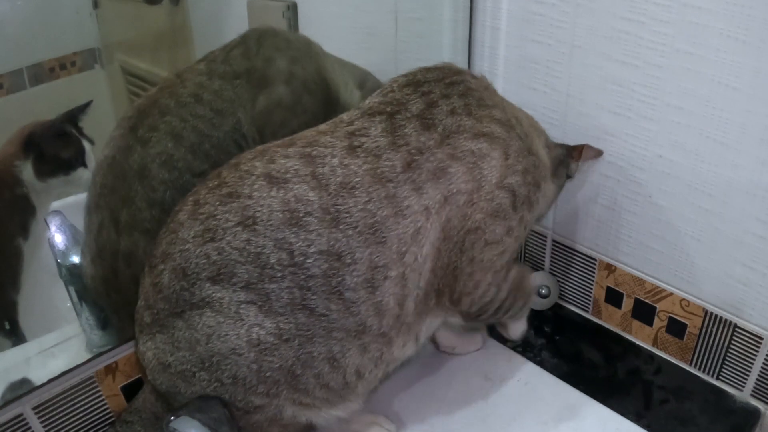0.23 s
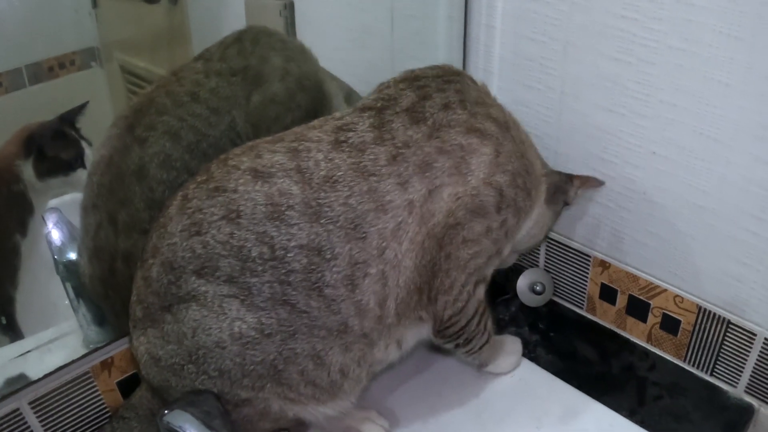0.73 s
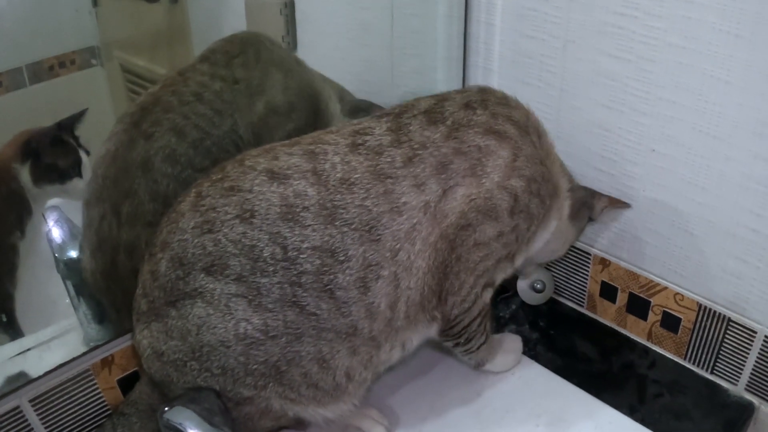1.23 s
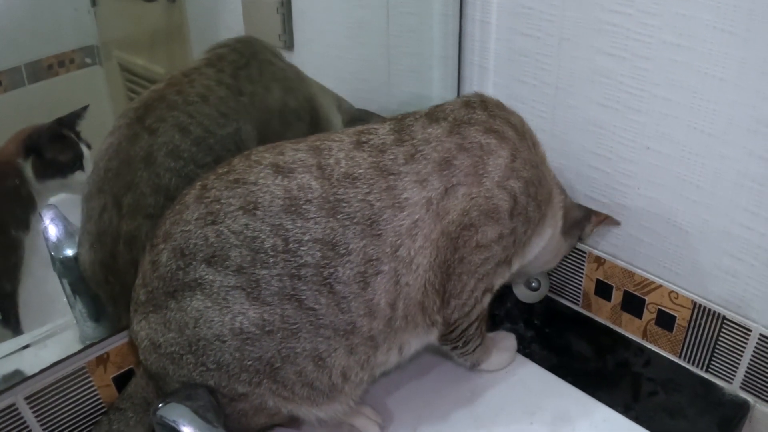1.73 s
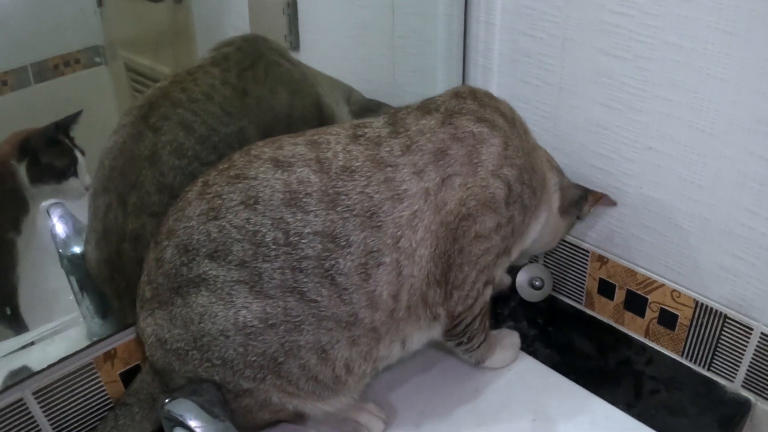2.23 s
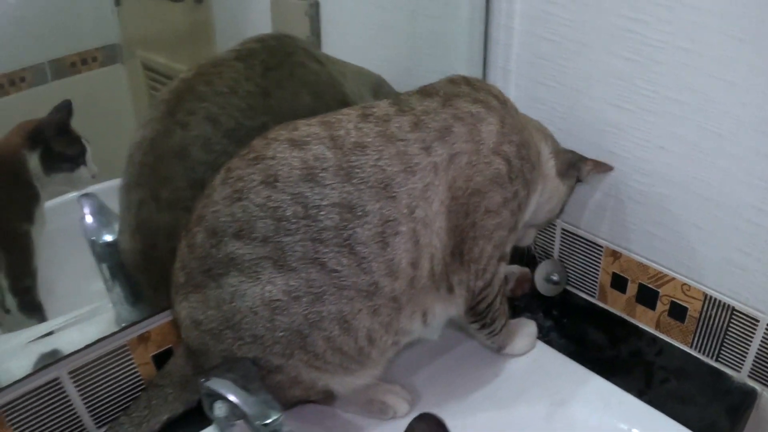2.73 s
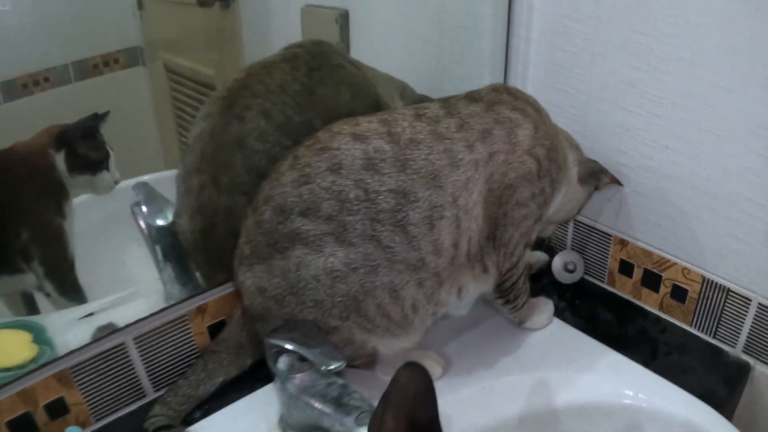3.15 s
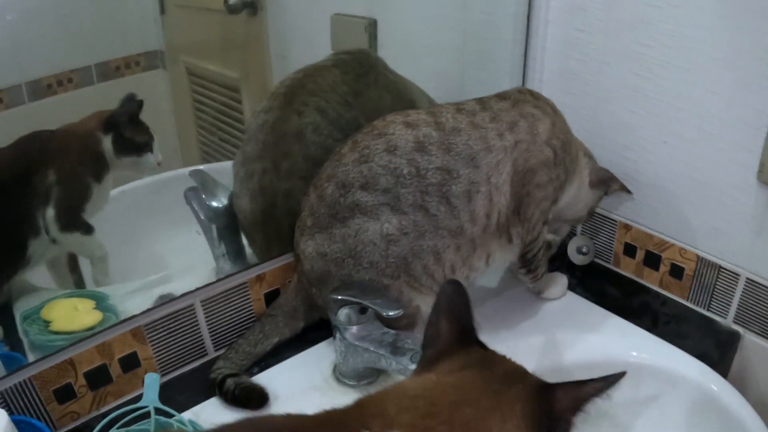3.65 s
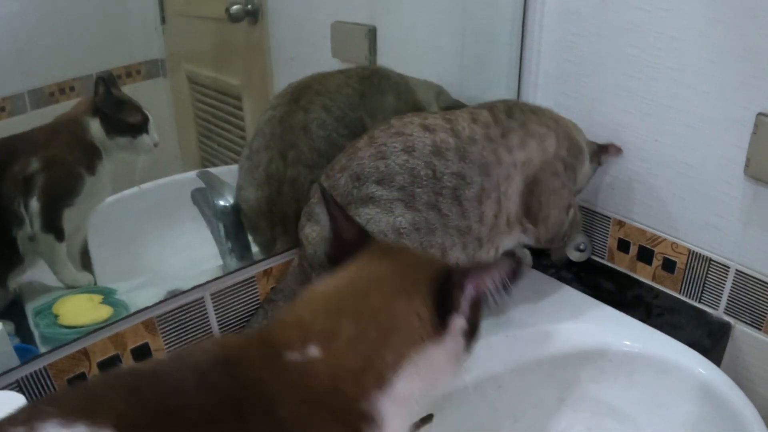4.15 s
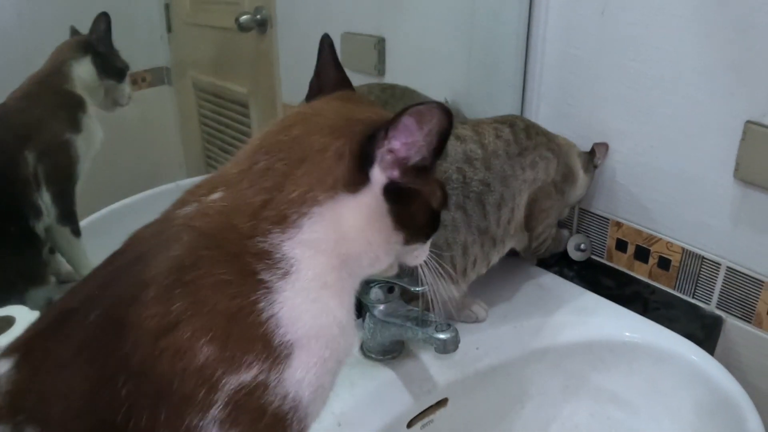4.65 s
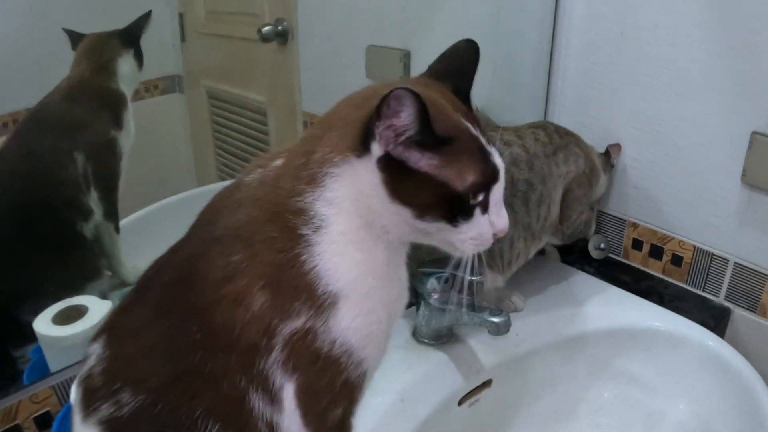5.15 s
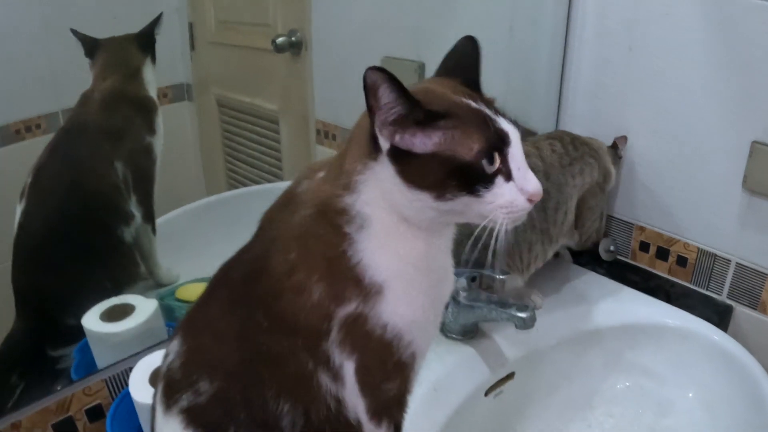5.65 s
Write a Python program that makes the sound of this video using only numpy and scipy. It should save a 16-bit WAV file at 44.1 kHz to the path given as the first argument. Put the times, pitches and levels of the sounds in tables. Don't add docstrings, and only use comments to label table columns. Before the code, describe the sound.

Over low extractor hum in a small hard-walled bathroom, thin mouse peeps grow into raspy squeal clusters amid small paw knocks and scrapes.

```python
import sys
import numpy as np
from scipy import signal
from scipy.fft import rfft, irfft, next_fast_len
from scipy.io import wavfile
from scipy.ndimage import map_coordinates

SR = 44100
rng = np.random.default_rng(int(sys.argv[2]) if len(sys.argv) > 2 else 0)


def inscribe(sig):
    pcm = np.round(np.clip(np.atleast_2d(sig).T, -1, 1) * 32767)
    wavfile.write(sys.argv[1], SR, pcm.astype(np.int16))


def volts_from_db(level):
    exponent = np.asarray(level, float) / 20
    return 10 ** exponent


N = 259969
TIME = np.arange(N) / SR

# t/s, mains hum level/dB, blade rumble level/dB
FAN_LEVELS = [(.4, -49, -61.5), (.98, -48, -60.5), (1.5, -49, -61.5), (1.93, -48.5, -64.5),
              (2.4, -49, -62.5), (3, -50, -62), (3.5, -50.5, -65.5), (4.4, -51, -65.5), (5.1, -52.5, -69),
              (5.47, -52, -63.5), (5.89, -52.5, -65)]
# f/Hz, density/dB
RUMBLE_SPECTRUM = [(11, -73), (18, -16), (43, -40), (68, -3.5), (97, -18), (123, 1.5), (155, -5.5),
                   (212, -8.5), (257, -28), (305, -22.5), (400, -18), (520, -52), (880, -120)]
# f/Hz, density/dB
AIR_SPECTRUM = [(150, -47), (250, -11.5), (301, -8.5), (335, -12.5), (443, -12.5), (748, -18.5),
                (859, -19.5), (943, -22), (1280, -17.5), (1690, -18.5), (3450, -24.5), (7230, -34),
                (10000, -59), (13000, -111), (22000, -120)]
# t/s, knock level/dB, then thud, scratch, edge re knock/dB
PAW_CONTACTS = [(1.1244, -53.5, -26, -25, -63), (2.5223, -38, -5, -2, -40), (2.65, -45, -22, 2, -15),
                (2.826, -25, -70, 2.5, -8), (2.8689, -32, -50, -1, -14), (3.026, -41, -12.5, -19, -31),
                (3.1662, -43, -22, -18, -27), (3.2778, -36, -38, -12, -17), (3.2874, -33, -45, -10, -6),
                (3.3147, -40, -45, 4, -28), (3.422, -47, -36, 1, -27), (3.4858, -30, -56, 8, -1),
                (3.4982, -37, -39, 14.5, -15), (3.5297, -36, -28, -3, -27), (3.6024, -42, -0.5, 5, -33),
                (4.3044, -30, -33, 2, 4), (4.4661, -31, -43, -15, -13), (4.671, -42, -36, -15, -30),
                (4.888, -34, -38, -15, -30), (4.6185, -36, -45, 12, -18), (5.287, -36.5, -33, 5, -22),
                (5.3223, -47.5, -14, 2, -15), (5.435, -42, -46, 13.5, -26)]
# f/Hz, width/Hz, level/dB
TILE_MODES = [(1550, 450, 0), (2000, 600, -2), (2550, 500, -1)]
# f/Hz, width/Hz, level/dB
CLAW_MODES = [(3500, 900, 0), (4850, 900, 1)]
# f/Hz, width/Hz, level/dB
BASIN_MODES = [(255, 45, 5), (320, 50, 3), (600, 120, 0), (820, 200, -4)]
# peak t/s, swell/s, fade/s, peak level/dB
FUR_STROKES = [
    (1.5, 0.13, 0.02, -70),
    (1.575, 0.047, 0.026, -62.5),
    (1.867, 0.054, 0.003, -56.5),
    (2.524, 0.039, 0.013, -48.5),
    (3.022, .005, 0.092, -53.5),
    (3.604, 0.0049, 0.15, -55.5),
    (4.048, 0.0091, 0.054, -64.5),
    (4.2, 0.12, 0.061, -65),
    (5.684, 0.0045, 0.033, -60.5),
    (5.78, 0.05, 0.039, -69),
]
# f/Hz, density/dB
FUR_SPECTRUM = [(530, -1), (900, -4), (1880, -7), (2010, -2.5), (2280, 0), (7190, -10), (9260, -24),
                (11300, -20.5), (14000, -54)]
# t/s, length/s, f/Hz, level/dB, overtone level/dB
WHISTLE_NOTES = [
    (1.641, 0.036, 3536, -47, -11.5),
    (2.117, 0.021, 3746, -37.5, -11.5),
    (2.887, 0.046, 3773, -41, -11),
    (3.224, 0.064, 3777, -44, -19.5),
    (4.247, 0.069, 3827, -33.5, -17.5),
    (5.471, 0.053, 3808, -39, -0.5),
    (5.838, 0.035, 3866, -43.5, -5.5),
]
# t/s, length/s, f/Hz, level/dB, overtone level/dB
FLIP_NOTES = [
    (1.932, 0.014, 3825, -34.5, -9),
    (2.249, 0.019, 3578, -33, -8.5),
    (2.597, 0.035, 3672, -34, -9),
    (4.42, 0.022, 3856, -34, -19),
    (4.474, 0.0088, 3935, -31.5, -9),
    (4.68, 0.051, 3886, -37, -6.5),
    (4.785, 0.073, 3766, -37, -8),
    (5.072, .032, 3837, -36.5, -8),
    (5.155, 0.022, 3724, -35.5, -23),
]
WHISTLE_PARTIALS_DB = [0, -25.5, -40]
# t/s, length/s, start f/Hz, end f/Hz, level/dB
SLIDE_NOTES = [
    (1.87, 0.018, 3930, 3410, -43),
    (1.92, 0.014, 2336, 3080, -36.5),
    (2.198, 0.019, 3650, 3210, -39),
    (2.211, 0.013, 2754, 2440, -40.5),
    (2.579, 0.023, 2970, 3660, -36),
    (4.909, 0.013, 3930, 3630, -39.5),
    (4.912, 0.0069, 2500, 1750, -38.5),
    (4.922, 0.0155, 2120, 2576, -40),
]
# t/s, f/Hz, level/dB, overtone level/dB
CRY_FALL = [
    (4.347, 2377, -33.5, 10.5),
    (4.356, 2293, -35, 1.5),
    (4.375, 2366, -38.5, 4.5),
    (4.42, 2220, -42.5, -12),
]
# t/s, f/Hz, level/dB, overtone level/dB
CRY_RISE = [
    (4.303, 1990, -50, 8),
    (4.318, 2140, -41, 11),
    (4.33, 2360, -43, 11),
    (4.342, 2470, -39.5, 7),
    (4.35, 2430, -40, 7),
]
# f/Hz, gain/dB
MOUTH_GAIN = [(4500, 3), (6000, -12), (6900, 0.5), (7700, 2.5), (8400, -7), (9500, -12), (12000, -41)]
# t/s, length/s, level/dB, brightness/dB, slap rate f/Hz
RASP_BURSTS = [(1.873, 0.0064, -38.5, -23, 1179), (1.926, .025, -49, -8, 1395),
               (2.201, 0.054, -43.5, -14, 1143), (2.538, 0.058, -39.5, -11, 1196),
               (3.778, 0.054, -64.5, 8.5, 1264), (4.282, 0.026, -47, -4.5, 1029),
               (4.33, .06, -53.5, 13, 1153), (4.39, 0.043, -44, -0.5, 1149), (4.479, .08, -50, 6, 1201),
               (4.712, .045, -46.5, 2.5, 1137), (4.756, .042, -49.5, 2.5, 756.7),
               (4.913, 0.051, -48.5, 2, 898.4), (5.099, 0.089, -50, 5.5, 1147),
               (5.315, 0.029, -49.5, 2, 1215)]
# f/Hz, density/dB
THROAT_SPECTRUM = [(600, -32), (1000, -21.5), (1450, -3), (2350, -3), (2900, -2), (3600, -1.5),
                   (4600, -6.5), (5500, -11.5), (6700, -14.5), (7500, -5.5), (8300, -16.5), (10500, -22.5),
                   (13000, -36.5), (15500, -37)]
# t/s, f/Hz, level/dB, overtone level/dB
WHINE_CONTOUR = [
    (3.745, 3580, -45, -9),
    (3.765, 3807, -42, -5),
    (3.8, 3768, -46.5, 1.5),
    (3.861, 3550, -48, 1.5),
    (3.9, 3410, -51.5, -17),
]
WHINE_PARTIALS_DB = [0, -13, -42]
# t/s, length/s, f/Hz, level/dB, overtone level/dB
SQUEAL_NOTES = [
    (4.49, 0.0671, 2362, -39, 6.5),
    (4.733, 0.024, 2246, -39, -12),
    (5.105, 0.054, 2272, -37, 2),
    (5.315, 0.031, 2420, -43.5, 0),
]
# f/Hz, t60/s
WALL_DECAY = [(200, 0.99), (700, 0.64), (1500, 0.55), (2600, 0.56), (4000, 0.44), (7000, 0.45),
              (11000, 0.45), (15000, 0.037)]
# f/Hz, gain/dB
MICROPHONE_GAIN = [(8300, 1), (8850, -3.5), (9080, -20), (9300, -6.5), (10200, 2)]
# f/Hz, gain/dB
PORT_DIFFERENCE = [(20, -18), (60, -38), (300, -28), (800, -40), (2000, -44), (9800, -40), (11300, -1),
                   (14000, -1), (16000, -5)]
# f/Hz, density/dB
PORT_HISS = [(8000, -30), (9500, -12), (10500, -3), (11500, -3), (12800, -7), (13600, -14), (14200, -30),
             (15700, -34)]


def unit(x):
    return x / np.sqrt(np.mean(x ** 2) + 1e-20)


def along(points, hz):
    f, v = np.transpose(points)
    return np.interp(np.log(hz + 1), np.log(f + 1), v)


def stretch(rows, fade_s):
    s, *cols = np.transpose(rows)
    first = round(s[0] * SR)
    t = np.arange(first, min(N, round(s[-1] * SR))) / SR
    gate = np.clip(np.minimum(t - s[0], (s[-1] - t) / 4) / fade_s, 0, 1)
    return slice(first, first + len(t)), gate, [np.interp(t, s, c) for c in cols]


def wobble(rate_hz, size=N):
    knots = rng.standard_normal(int(size * rate_hz / SR) + 4)
    return map_coordinates(knots, [np.arange(size) * rate_hz / SR])


def filtered(x, response):
    m = next_fast_len(N + SR // 2)
    return irfft(rfft(x, m) * response(np.fft.rfftfreq(m, 1 / SR)), m)[..., :N]


def coloured(x, spectrum):
    return unit(filtered(x, lambda hz: volts_from_db(along(spectrum, hz))))


def modes(peaks):
    def response(f):
        return sum((-1) ** k * volts_from_db(db) * 1j * f * width / (centre ** 2 - f * f + 1j * f * width)
                   for k, (centre, width, db) in enumerate(peaks))
    return response


def fan():
    s, *cols = np.transpose(FAN_LEVELS)
    hum_db, rumble_db = (np.interp(TIME, s, c) for c in cols)
    phase = 2 * np.pi * 100.1 * TIME + 0.09 * wobble(2.87)
    hum = volts_from_db(hum_db - 1 + 0.3 * wobble(1.72)) * np.sin(phase)
    hum += volts_from_db(-71 + 2.5 * wobble(4.6)) * np.sin(2 * phase)
    hum += volts_from_db(hum_db - 26.5 + 2.0 * wobble(4.63)) * np.sin(3 * phase)
    gap = lambda hz: 1 - 0.55 * np.exp(-((hz - 100) / 14) ** 2)
    rumble = unit(filtered(coloured(rng.standard_normal(N), RUMBLE_SPECTRUM), gap))
    air = coloured(rng.standard_normal(N), AIR_SPECTRUM) * volts_from_db(0.93 * wobble(7.42))
    return hum + volts_from_db(rumble_db + 3.1 * wobble(4.055)) * rumble + volts_from_db(-64.5) * air


def paws():
    knock, thud, scratch, edge = np.zeros((4, N))
    t = np.arange(900) / SR
    for s, db, thud_db, scratch_db, edge_db in PAW_CONTACTS:
        burst = rng.standard_normal(len(t)) * volts_from_db(-60 * t / .007) * (1 - np.exp(-t / .0003))
        at = slice(round(s * SR), round(s * SR) + len(t))
        knock[at] += volts_from_db(db + 18.0) * burst
        scratch[at] += volts_from_db(db + scratch_db + 0.5) * burst
        edge[at] += volts_from_db(db + edge_db + 3) * burst
        thud[at] += volts_from_db(db + thud_db + 17.0) * rng.standard_normal(len(t)) * volts_from_db(-60 * t / 0.12)
    sharp = lambda hz: (1j * hz / 6000 / (1 + 1j * hz / 6000)) ** 4
    thin = lambda hz: (-(hz / 1350) ** 2 / (1 + 1.1j * hz / 1350 - (hz / 1350) ** 2)) ** 2
    soften = lambda hz: 1 / (1 + 1j * hz / 11000 - (hz / 12000) ** 2) ** 5
    claws = filtered(filtered(knock, modes(TILE_MODES)) + filtered(scratch, modes(CLAW_MODES)), thin)
    blows = claws + filtered(thud, modes(BASIN_MODES)) + filtered(edge, sharp)
    return filtered(blows, soften)


def fur():
    level = np.zeros(N)
    range_db = 22.5
    for s, swell_s, fade_s, db in FUR_STROKES:
        rows = [(s - swell_s, db - range_db), (s, db), (s + fade_s, db - range_db / 2)]
        at, gate, (stroke_db,) = stretch(rows, fade_s=0.0024)
        level[at] += gate * volts_from_db(stroke_db + 3.5)
    return level * coloured(rng.standard_normal(N) * volts_from_db(2.2 * wobble(300)), FUR_SPECTRUM)


def contours(notes, onset_s, flat, soft_db, sag_hz, fade_db, dulls_db):
    return [[(s, hz * (1 - flat), db - soft_db, bright_db),
             (s + min(onset_s, 0.19 * length), hz, db, bright_db),
             (s + length, hz - sag_hz * length, db - fade_db * length, bright_db - dulls_db * length)]
            for s, length, hz, db, bright_db in notes]


def tones(notes, stack_db, jitter, shimmer_db, breath_db, scoop):
    out, leak = np.zeros((2, N))
    for rows in notes:
        at, gate, (hz, db, bright_db) = stretch(rows, fade_s=.0008)
        size = len(hz)
        rise = 1 - scoop * np.exp(-np.arange(size) / SR / 0.00098)
        phase = 2 * np.pi * np.cumsum(hz * rise * (1 + jitter * wobble(147.9, size))) / SR
        overtones = sum(volts_from_db(bright_db + stack_db(k, hz)) * np.sin((k + 2) * phase) for k in range(3))
        out[at] += gate * (np.sin(phase) + overtones) * volts_from_db(db + 3.0 + shimmer_db * wobble(128.3, size))
        leak[at] += gate * volts_from_db(db + breath_db)
    return out + leak * coloured(rng.standard_normal(N), THROAT_SPECTRUM)


def mouth_db(k, hz):
    return along(MOUTH_GAIN, (k + 2) * hz)


def whistle():
    partials = lambda k, hz: WHISTLE_PARTIALS_DB[k]
    alone = contours(WHISTLE_NOTES, onset_s=0.01, flat=-0.0099, soft_db=-1.5, sag_hz=2140, fade_db=90,
                     dulls_db=115)
    flips = contours(FLIP_NOTES, onset_s=0.013, flat=0.002, soft_db=-1.8, sag_hz=1470, fade_db=51, dulls_db=98)
    return (tones(alone, partials, jitter=0.01, shimmer_db=-1.5, breath_db=-19.5, scoop=0.15)
            + tones(flips, partials, jitter=0.0068, shimmer_db=-0.6, breath_db=-12, scoop=0))


def slide():
    overtones_db = -8
    slides = [[(s, hz, db, overtones_db), (s + length, to_hz, db, overtones_db)]
              for s, length, hz, to_hz, db in SLIDE_NOTES]
    return tones([CRY_FALL] + slides, mouth_db, jitter=0.0153, shimmer_db=-1.0, breath_db=-15, scoop=0)


def rasp():
    rate_hz = np.full(N, 1200.)
    uneven, dull, bright = np.zeros((3, N))
    for s, length, db, bright_db, hz in RASP_BURSTS:
        at, gate, (age,) = stretch([(s, 0), (s + length, length)], fade_s=.002)
        gate = gate * volts_from_db(3 * np.sin(np.pi * age / length) + 0.5 * wobble(50, len(gate)))
        rate_hz[at] = hz * (1 - 2.5 * age)
        uneven[at] = .17 * (1 - np.exp(-age / 0.01489))
        dull[at] = gate * volts_from_db(db + 2.0)
        bright[at] = gate * volts_from_db(db + bright_db + 0.5)
    phase = 2 * np.pi * np.cumsum(rate_hz * (1 + uneven * wobble(350))) / SR
    spread = np.cumsum(np.arange(17)) * 0.354
    slaps = sum(np.sin(k * phase + spread[k]) * (k * rate_hz < SR / 2.3) for k in range(1, 17))
    source = unit(slaps * volts_from_db(2 * wobble(500))) + .15 * rng.standard_normal(N)
    voice = coloured(source, THROAT_SPECTRUM)
    high = filtered(voice, lambda hz: 1 / (1 + (5300 / (hz + 1)) ** 8))
    return dull * unit(voice - high) + bright * unit(high)


def whine():
    return tones([WHINE_CONTOUR], lambda k, hz: WHINE_PARTIALS_DB[k], jitter=0.013, shimmer_db=4.0,
                 breath_db=-10.5, scoop=0.026)


def squeal():
    hollow_db = lambda k, hz: mouth_db(k, hz) - 5 * (k == 0)
    squeals = contours(SQUEAL_NOTES, onset_s=0.0089, flat=0.0496, soft_db=2.0, sag_hz=-800, fade_db=132,
                       dulls_db=14)
    return (tones([CRY_RISE], mouth_db, jitter=0.0034, shimmer_db=2.0, breath_db=-19, scoop=0)
            + tones(squeals, hollow_db, jitter=0.0076, shimmer_db=2.5, breath_db=-12, scoop=0))


def bathroom(x):
    out, hop = np.zeros(N + 2 * SR), SR // 4
    for start in range(SR, N, hop):
        hz, t, z = signal.stft(rng.standard_normal(SR * 3 // 4), SR, nperseg=256)
        decay = volts_from_db(-60 * t / along(WALL_DECAY, hz)[:, None]) * (1 - np.exp(-t / 0.0019))
        tail = signal.istft(z * decay, SR, nperseg=256)[1]
        piece = x[start:start + 2 * hop]
        piece = piece * np.hanning(2 * hop)[:len(piece)]
        wet = signal.fftconvolve(piece, tail / np.linalg.norm(tail))
        out[start + 130:][:len(wet)] += wet
    return out[:N]


def scene():
    mouse = whistle() + slide() + rasp() + whine() + squeal()
    contact = paws() + fur()
    echo = bathroom(volts_from_db(-2.5) * mouse + volts_from_db(-.5) * contact)
    mono = mouse + contact + echo + fan()
    return np.array([mono, mono])


def refilled(ports):
    fold_hz, image_top_hz = 12030, 13750
    band = filtered(ports, lambda hz: (hz > 2 * fold_hz - image_top_hz) * (hz < fold_hz))
    wander = 0.76 * np.array([wobble(40), wobble(40)])
    carrier = np.exp(4j * np.pi * fold_hz * TIME + 1j * wander)
    image = (np.conj(signal.hilbert(band, next_fast_len(N))[:, :N]) * carrier).real
    shelved = filtered(ports, lambda hz: np.where(hz > fold_hz, volts_from_db(-7), 1))
    return shelved + volts_from_db(-8.5) * image


def top_cut(x):
    return signal.sosfilt(signal.butter(12, 15840, fs=SR, output="sos"), x)


def record(dry):
    heard = filtered(dry, lambda hz: volts_from_db(along(MICROPHONE_GAIN, hz)))
    scatter = rng.standard_normal(SR // 20) * volts_from_db(-60 * TIME[:SR // 20] / .04)
    side = signal.fftconvolve(heard[0], scatter / np.linalg.norm(scatter))[:N]
    side = filtered(side, lambda hz: volts_from_db(along(PORT_DIFFERENCE, hz)))
    hiss = volts_from_db(-89.5) * coloured(rng.standard_normal((2, N)), PORT_HISS)
    ports = refilled(heard + np.array([side, -side])) + hiss
    fade_in = np.clip(TIME / 0.33, 0, 1) ** 1.08
    return top_cut(ports * fade_in)


dry = scene()
out = record(dry)
inscribe(out)
```